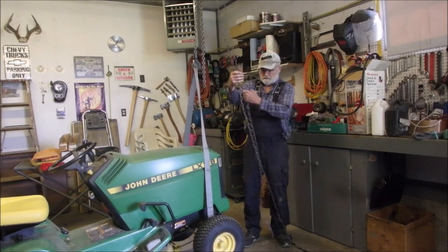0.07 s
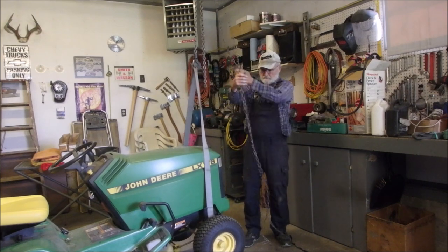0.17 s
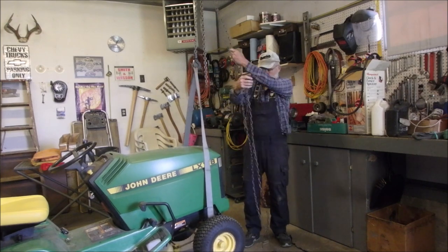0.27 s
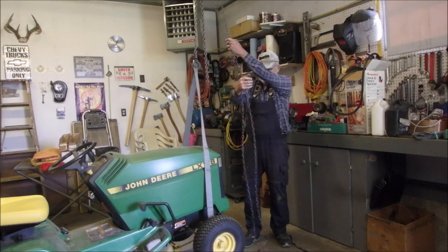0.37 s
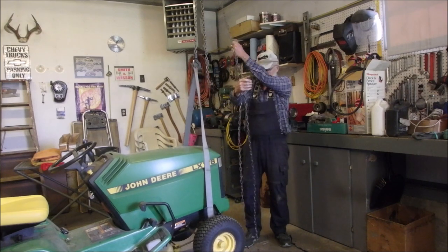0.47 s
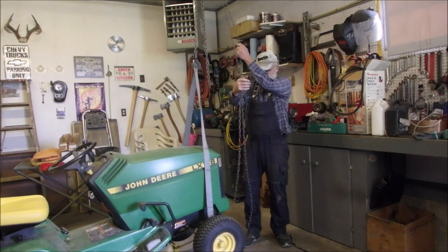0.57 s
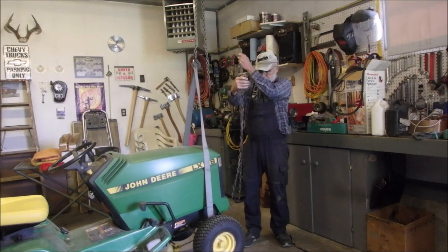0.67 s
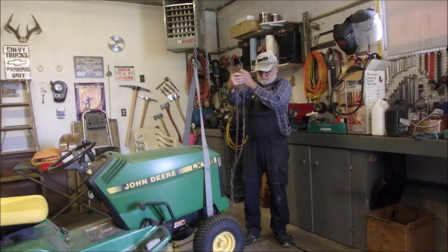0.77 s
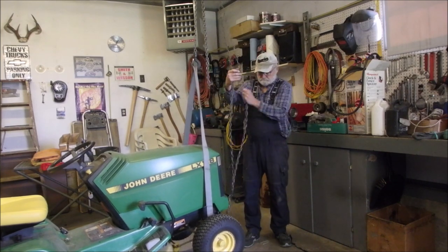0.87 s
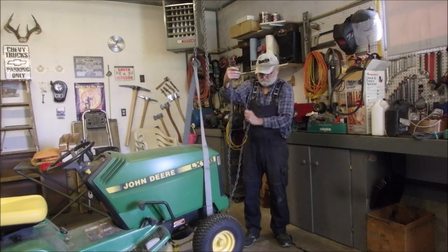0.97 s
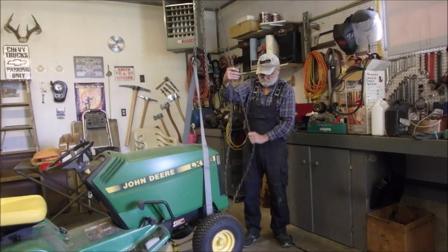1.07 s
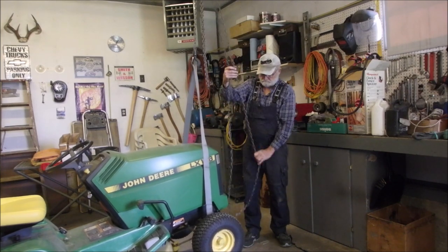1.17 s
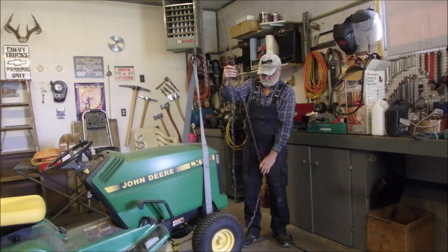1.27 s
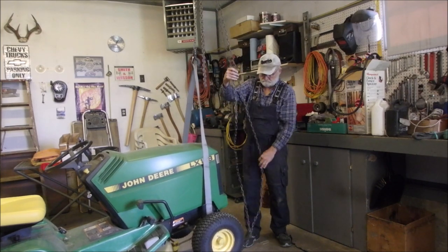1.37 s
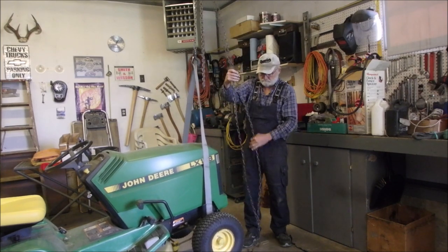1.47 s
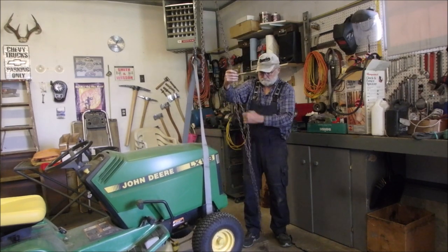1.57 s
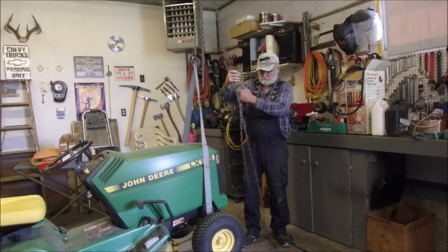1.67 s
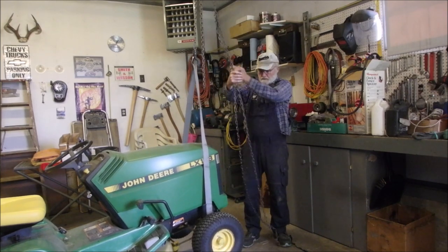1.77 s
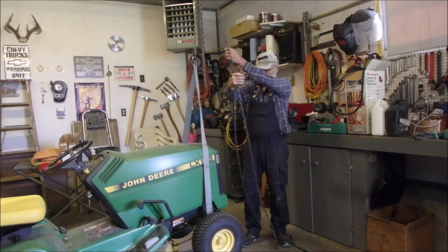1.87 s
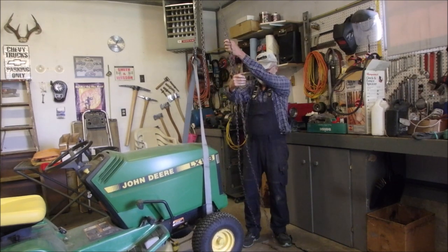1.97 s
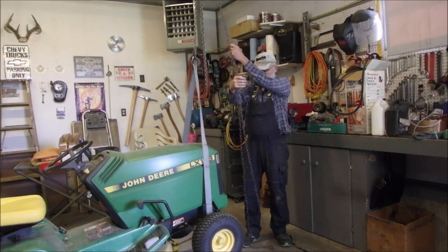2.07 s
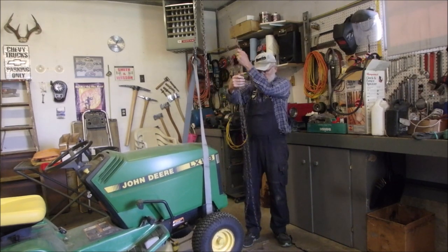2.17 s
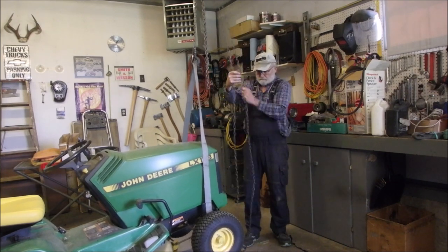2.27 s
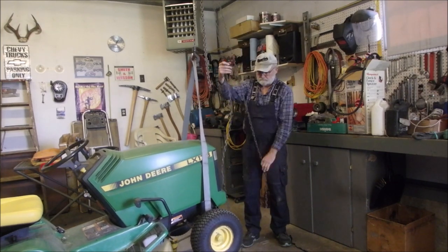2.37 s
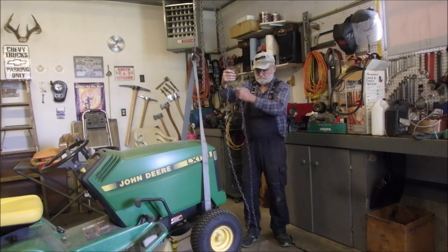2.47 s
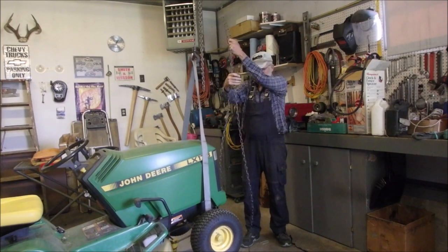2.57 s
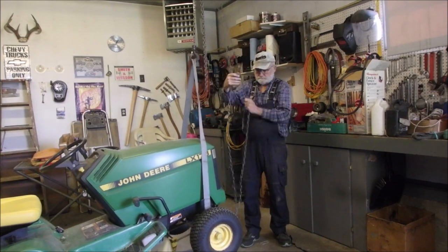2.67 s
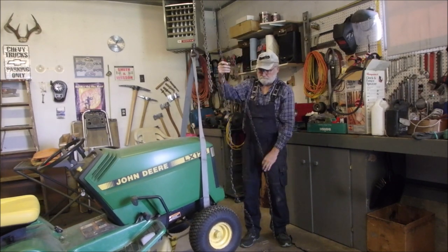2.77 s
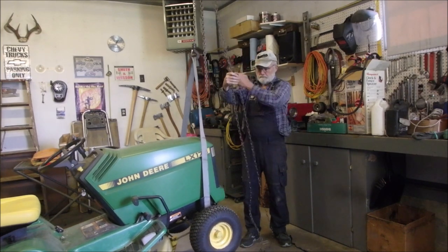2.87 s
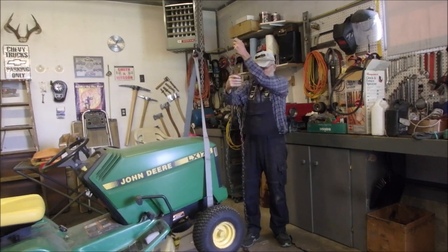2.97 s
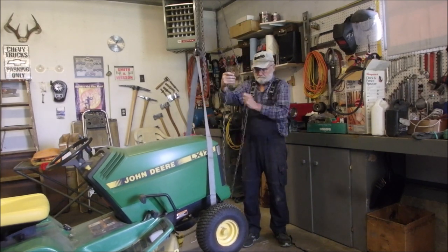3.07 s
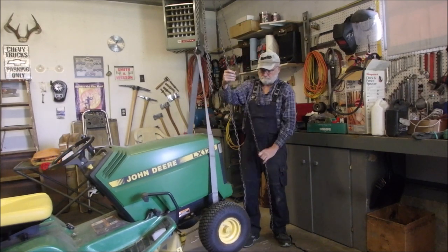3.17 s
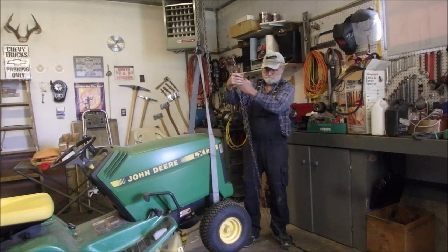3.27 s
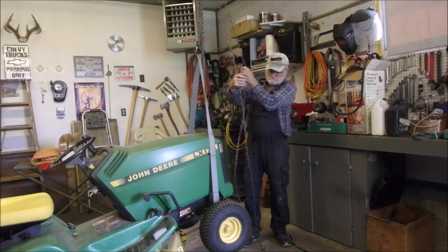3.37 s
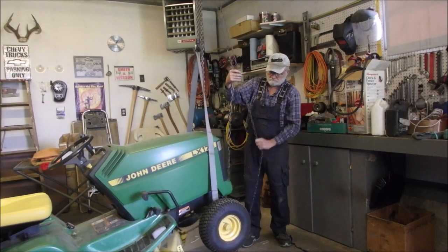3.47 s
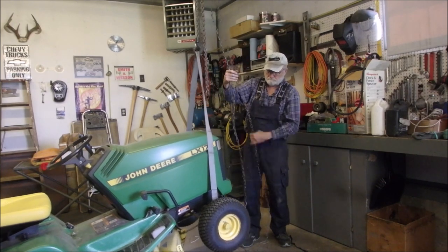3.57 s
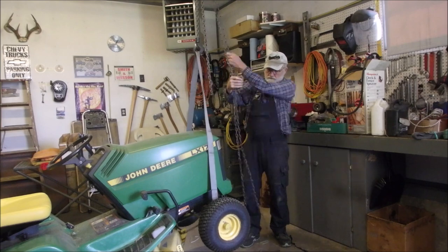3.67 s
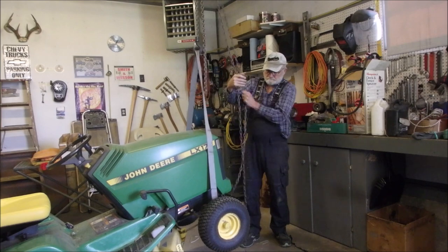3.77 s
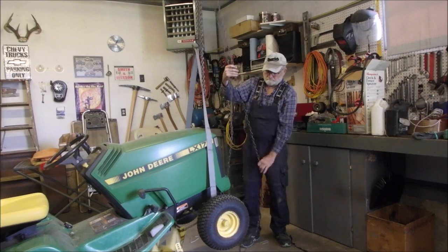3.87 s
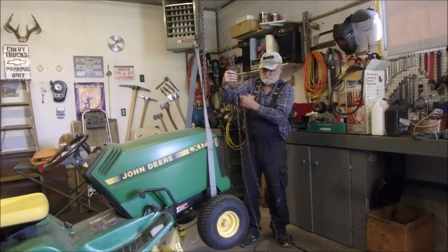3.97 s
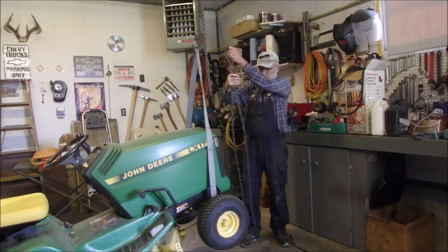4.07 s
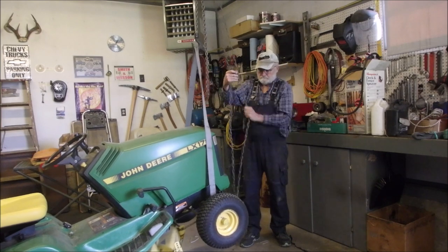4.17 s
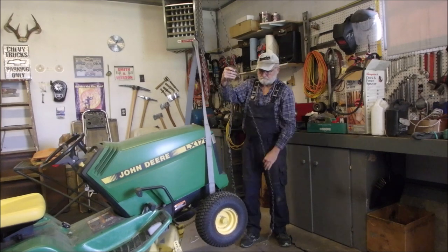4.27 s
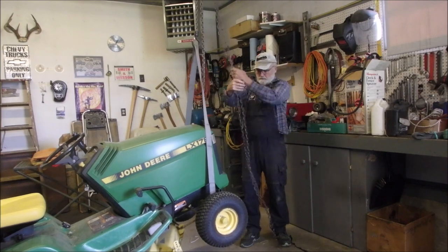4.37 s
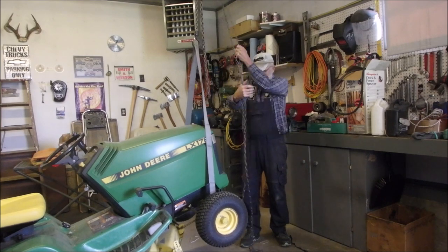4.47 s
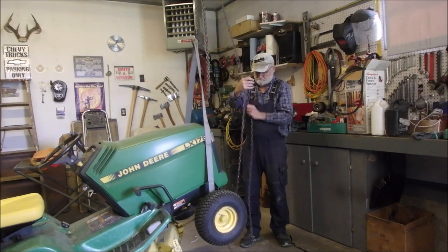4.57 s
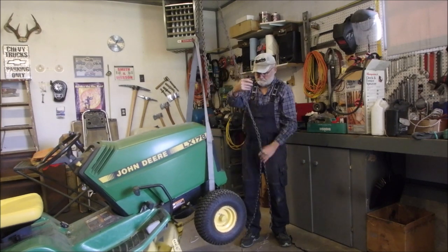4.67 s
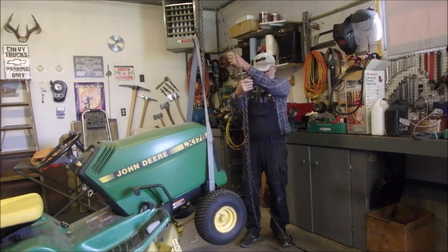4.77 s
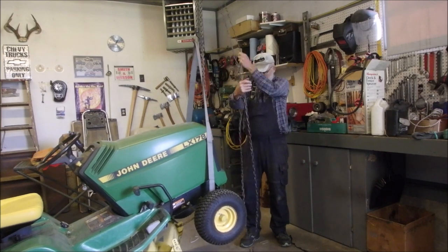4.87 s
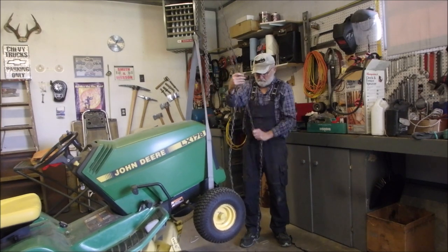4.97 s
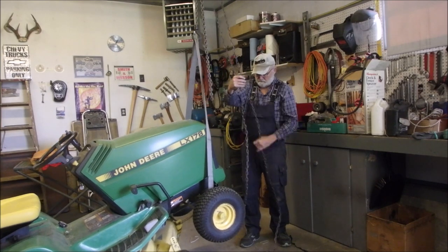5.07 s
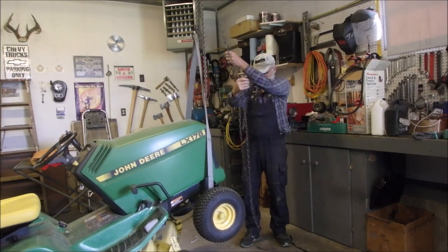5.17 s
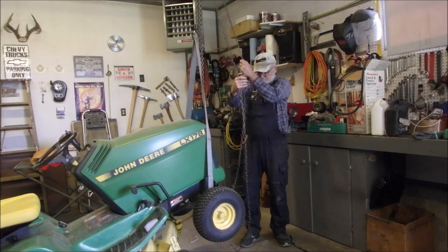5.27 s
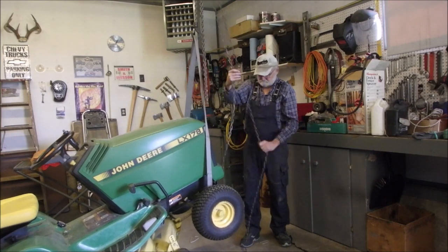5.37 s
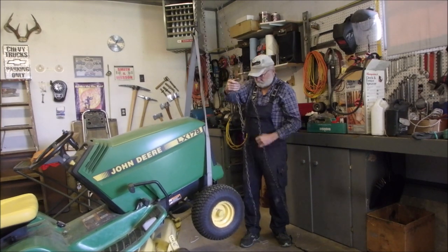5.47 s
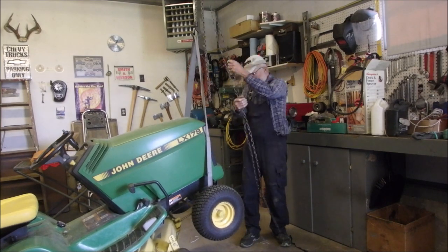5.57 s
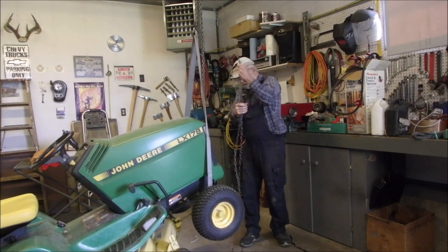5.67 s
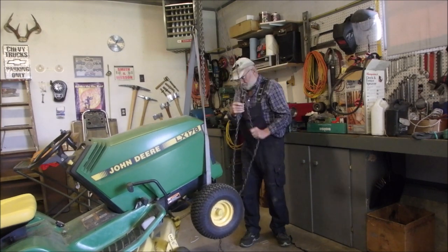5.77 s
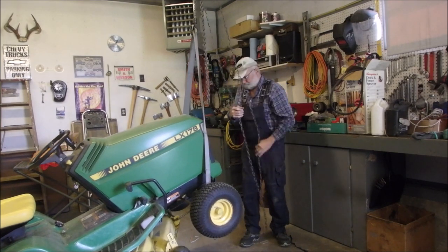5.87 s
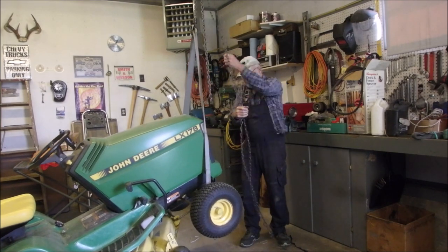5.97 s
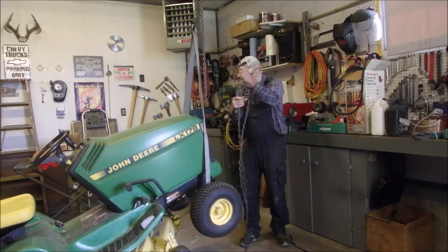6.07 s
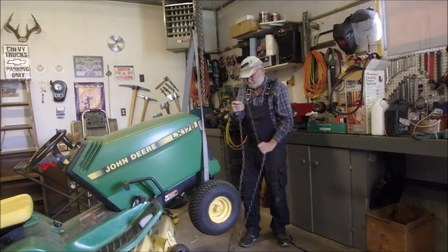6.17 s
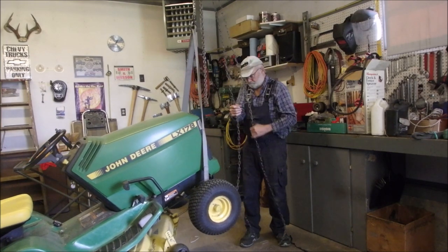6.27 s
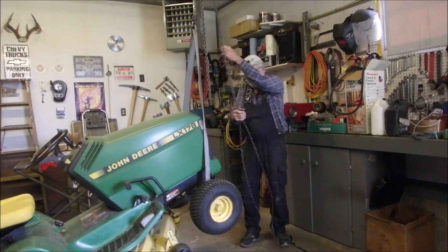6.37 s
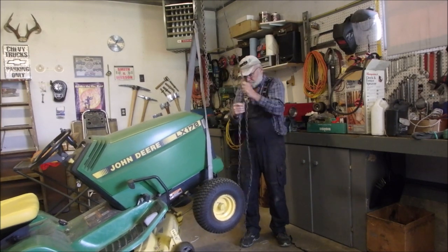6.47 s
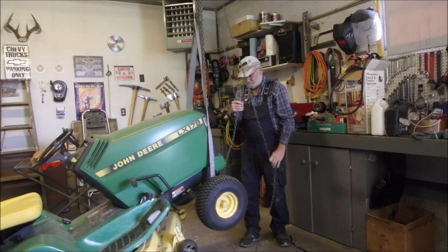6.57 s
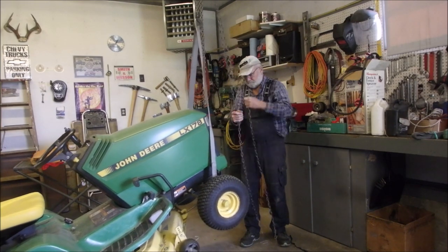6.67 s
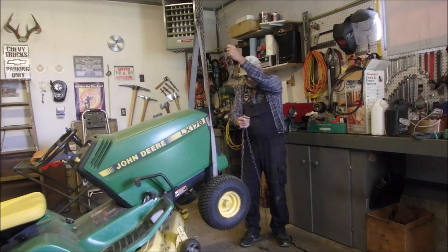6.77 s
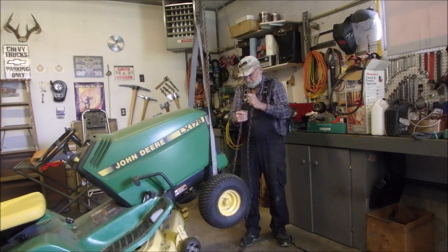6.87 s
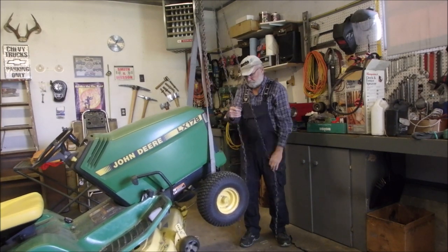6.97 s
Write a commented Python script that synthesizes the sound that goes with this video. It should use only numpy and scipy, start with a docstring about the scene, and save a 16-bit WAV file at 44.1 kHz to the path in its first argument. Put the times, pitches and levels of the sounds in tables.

```python
"""The end of a pull comes first, a brief clatter of links over faint workshop noise; a long haul follows.
A hand chain hoist is at work: the chain snaps, links clatter over the wheel, the pawl ticks and a faint
rumble swells; between pulls slack links jingle and the wheel knocks. After a cut it plays four times as fast.
Principle: contacts are impulses, or modulated trains of them, that excite the resonant steel and the
room; the rumble and the workshop are filtered noise."""
import sys
import numpy as np
from scipy import signal
from scipy.fft import rfft, irfft, next_fast_len
from scipy.io import wavfile

SR = 44100
rng = np.random.default_rng(int(sys.argv[2]) if len(sys.argv) > 2 else 0)


def output_pcm(signal):
    """Save a mono or channel-first signal as 16-bit PCM at the path in sys.argv[1].

    Samples are clipped to [-1, 1] before scaling.
    """
    pcm = np.clip(np.atleast_2d(signal).T, -1, 1) * 32767
    wavfile.write(sys.argv[1], SR, np.round(pcm).astype(np.int16))


N = 309613
TIME = np.arange(N) / SR
CUT_S, FAST = 2.321, 4  # time of the cut; playing speed after it
TOP_HZ = 15800  # upper band limit

# Pulls on the chain, slow then fast; start_s is when the pull is first heard, apart from its take-up.
# The first is already under way, and the one at 2.25 runs on across the cut as the next row.
# Levels are relative: start_s, rise_s, length_s, sag_db (fall over the pull), snap_db, links_db, wheel_db, rumble_db
PULLS = [ (0.0, 0.0016, 0.026, 12, -30, -32.5, -31, -35), (0.67, 0.21, 0.63, -2.5, -17.5, -22.5, -30, -41),
         (2.25, .025, 0.028, -1.5, -18, -23, -28.5, -16), (2.322, 0.0025, 0.13, 1, -21, -27, -31, -34),
         (2.676, 0.0084, 0.18, 5, -13.5, -29.5, -33, -25), (3.079, 0.081, 0.16, 6, -34, -23.5, -28, -23),
         (3.446, 0.02, 0.15, -3, -21, -27.5, -32, -25), (3.81, 0.011, 0.15, 3, -21, -26.5, -31, -24),
         (4.185, 0.01, .13, -2.5, -15, -24, -29.5, -22), (4.556, 0.023, 0.17, -1.5, -15.5, -27, -32, -27),
         (4.939, 0.022, 0.18, 0, -12, -27.5, -33, -28), (5.33, .03, 0.15, -0.5, -16, -26, -31, -26),
         (5.763, 0.015, 0.14, -2.5, -19, -25, -32.5, -28), (6.137, .015, 0.14, 0.5, -13, -25, -31, -22),
         (6.51, 0.0064, 0.16, 2, -15.5, -25, -31, -23), (6.891, 0.0086, 0.27, -8, -12, -23.5, -30.5, -27), ]
# Swings of the slack chain while the hand reaches up: start_s, length_s, level_db (relative)
REACHES = [(0.347, 0.088, -49), (0.445, .18, -47), (1.644, .3, -46.5), (2.006, 0.19, -52),
           (2.977, .045, -59), (4.125, .025, -49), (4.437, 0.038, -51)]
# Dull knocks of the wheel against its pawl, mostly as it settles: start_s, level_db (relative)
KNOCKS = [(0.471, -30.5), (0.753, -24), (1.957, -41), (2.025, -34), (2.19, -34.5), (2.27, -20),
          (2.531, -35), (3.297, -28), (3.389, -39), (3.642, -23.5), (4.297, -17), (4.774, -28),
          (5.537, -24), (5.684, -35.5), (5.949, -26), (6.082, -37), (6.339, -27.5), (6.716, -23.5)]
# Catches of the chain by the hand ahead of a pull: start_s, level_db (relative)
GRABS = [(0.644, -22.5), (2.622, -26), (3.011, -21.5), (3.418, -25), (3.783, -16.5), (4.15, -24),
         (4.507, -23), (4.884, -32), (5.283, -25.5), (5.739, -16), (6.103, -20.5), (6.464, -23.5),
         (6.862, -21)]
# Jolts of a link into its pocket in the wheel: start_s, level_db (relative)
JOLTS = [(0.715, -16.5), (0.755, -13), (2.268, -15.5), (2.709, -11), (3.461, -15), (4.206, -26),
         (6.156, -22)]
# Ring of the wheel after a knock, at natural speed: pitch_hz, level_db (energy against the knock), t60_s
WHEEL_RING = [(905, -22, 0.35), (2344, -30, 0.28)]

# Broad spectral colour of the hoist: frequency_hz, level_db
STEEL = [(8, -39), (30, -45.5), (70, -22), (140, -13), (300, -10.5), (550, -8.5), (900, 1.5), (1900, -3),
         (3000, 0), (5400, -6), (7500, 0), (10000, -7), (12500, -11.5), (15000, -23.5)]
# Resonances and, where negative, dips: centre_hz, width_hz, level_db
MODES = [(163, 25, 5), (217, 14, 8), (303, 25, 8), (541, 45, 6), (692, 14, 5), (811, 25, 6), (875, 80, 11),
         (1005, 45, 6), (1523, 45, 7), (1664, 150, 7), (2204, 45, -26), (2361, 12, 4), (2366, 80, 14),
         (2539, 80, 11), (2636, 45, 4), (2819, 150, 8), (3100, 45, -17), (3208, 45, 10), (3349, 25, 11),
         (3424, 45, 12), (3662, 80, 4), (3986, 80, 7), (4094, 45, -14), (4245, 80, 12), (4418, 300, 6),
         (4785, 300, 6), (5951, 80, 6), (6103, 80, -14), (6502, 300, 13), (8090, 300, 4), (8996, 30, 6)]
# Colours relative to the hoist: frequency_hz, level_db
KNOCK_TILT = [(100, 6.5), (500, 0), (900, -1), (1500, -0.5), (2400, -4.5), (5000, -17), (15000, -17)]
SNAP_TILT = [(100, -3.5), (500, -4), (900, 0.5), (1400, -1), (3000, -5), (7000, 4.5), (15000, 9.5)]
SLACK_TILT = [(100, -10), (900, -14), (2500, -13), (5000, -1.5), (6500, -4.5), (8000, 3), (15000, 7.5)]
# The heavy wheel sounds below the light links: frequency_hz, level_db
WHEEL_TILT = [(30, 7), (100, -3), (500, 3), (900, 1.5), (1150, 3), (1500, -0.5), (2200, 0), (5000, -87)]
LINK_TILT = [(400, -37), (900, -21), (1200, -12), (1550, 2), (4000, 1.5), (15000, 5)]
# Background noise of the workshop: frequency_hz, level_db
AIR = [(10, -44), (45, -26), (90, -16.5), (170, -4.5), (400, -4.5), (900, -3), (3000, -9), (15000, -31)]
# Deep rumble under the pulls: frequency_hz, level_db
RUMBLE = [(10, 4.5), (30, -11), (100, -7.5), (180, -7.5), (500, -50)]
# Width of the stereo image: frequency_hz, side_minus_mid_db
WIDTH = [(20, -19), (100, -41), (350, -117), (700, -28), (1300, -36.5), (2400, -18), (4400, -8),
         (8100, -6.5), (15000, 2)]
# Reverberation of the workshop at natural speed: frequency_hz, t60_s
ROOM = [(100, 1.6), (500, 0.9), (1500, 0.86), (4000, 0.85), (8000, 0.61), (15000, 0.21)]

# Envelope of every pull
TAKE_UP_S = 0.041  # the slack runs out this long before start_s
TAKE_UP_DB, TAKE_UP_GROWS_DB = -9, 15.5  # level that this running reaches, and its growth on the way
START_DB = -8.5  # level at start_s, against the full haul
COAST_DB_PER_S = 98.5  # decay at natural speed as the wheel slows once the arm stops


def amp(db):
    """Level: decibels become an amplitude ratio."""
    return 10 ** (np.asarray(db) / 20)


def along(points, hz):
    """Interpolation: a table is read along a logarithmic frequency axis."""
    table_hz, values = np.transpose(points)
    return np.interp(np.log(hz + 1), np.log(table_hz), values)


def at_speed(rows, speed):
    """Time scale: select the events in the part played at this speed."""
    return [row for row in rows if (row[0] < CUT_S) == (speed == 1)]


def workshop(speed, air_db=-58.5):
    """Stationary noise: filtered noise, nearly alike in both ears, fills one side of the cut."""
    size = next_fast_len(N, True)
    hz = np.fft.rfftfreq(size, 1 / SR) / speed
    spectra = rfft(rng.standard_normal((2, size))) * amp(along(AIR, hz))
    mid = irfft(spectra[0], size)[:N]
    side = irfft(spectra[1] * amp(along(WIDTH, hz)), size)[:N]
    heard = (TIME < CUT_S) == (speed == 1)
    return amp(air_db) * heard * np.array([mid + side, mid - side]) / mid.std()


def effort(start_s, rise_s, length_s, sag_db, speed):
    """Amplitude envelope: the slack runs out, the haul builds, sags or swells, and the wheel coasts to rest."""
    age = TIME - start_s
    early = np.clip(-age / TAKE_UP_S, 0, 1)
    take_up = (early < 1) * amp(TAKE_UP_DB - TAKE_UP_GROWS_DB * early)
    build_db = START_DB * np.clip(1 - age / rise_s, 0, 1)
    hold_db = sag_db * (.5 - np.clip(age / length_s, 0, 1))
    coast_db = -COAST_DB_PER_S * speed * np.clip(age - length_s, 0, 1)
    return np.where(age < 0, take_up, amp(build_db + hold_db + coast_db))


def rumble(gain_db=-47, side_db=-1, share=0.47, fade_db=1):
    """Modulated noise: a deep rumble, wider than the clatter, swells in the first part of each row of PULLS."""
    size = next_fast_len(N, True)
    colour = amp(along(RUMBLE, np.fft.rfftfreq(size, 1 / SR)))
    mid, side = irfft(rfft(rng.standard_normal((2, size))) * colour, size)[:, :N]
    side = amp(side_db) * side
    pair = np.array([mid + side, mid - side]) / mid.std()
    swell = np.zeros(N)
    for speed in (1, FAST):
        for start_s, rise_s, length_s, *_, rumble_db in at_speed(PULLS, speed):
            pull = effort(start_s, rise_s, share * length_s, fade_db, speed)
            swell += amp(rumble_db) * (TIME > start_s) * pull
    return amp(gain_db) * swell * pair


def housing_db(hz):
    """Modal superposition: resonant peaks and dips add in decibels to the broad colour of the steel."""
    modes_db = sum(db / (1 + (2 * (hz - centre) / width) ** 2) for centre, width, db in MODES)
    return along(STEEL, hz) + modes_db


def causal(gain):
    """Minimum phase: folding the cepstrum gives the causal response with this gain."""
    cepstrum = irfft(np.log(np.maximum(gain, 1e-6)))
    half = len(cepstrum) // 2
    cepstrum[1:half] *= 2
    cepstrum[half + 1:] = 0
    return np.exp(rfft(cepstrum))


def ringer(speed):
    """Linear response of hoist and room; faster playing raises pitch and shortens time alike."""
    size = 2 ** 15 // speed
    t = np.arange(size) / SR * speed  # natural time
    hz = np.fft.rfftfreq(size, 1 / SR) / speed  # natural frequency
    body_db, width = housing_db(hz), amp(along(WIDTH, hz))
    cut = round(CUT_S * SR)
    start, end = (0, cut) if speed == 1 else (cut, N)

    def sound(contacts, tilt=None, crack_db=10, crack_t60=0.011, early_db=5, early_t60=0.21, rise_s=0.00088):
        """Convolution: contacts at one spot ring the steel along their own path through the room."""
        # reverberant tail: noise that decays at its own rate in each band
        bins, frames, cells = signal.stft(rng.standard_normal((2, size)), SR, nperseg=256)
        decay = amp(-60 * speed * frames / along(ROOM, bins / speed)[:, None])
        tail = signal.istft(cells * decay, SR, nperseg=256)[1][:, :size]
        # the direct crack and the nearest walls stand above the long tail
        early = amp(crack_db - 60 * t / crack_t60) + amp(early_db - 60 * t / early_t60)
        answer = tail + early * rng.standard_normal((2, size))
        answer *= 1 - np.exp(-t / rise_s)
        colour = causal(amp(body_db + (along(tilt, hz) if tilt else 0)))
        mid, side = irfft(rfft(answer) * [colour, colour * width])
        pair = np.float32([mid + side, mid - side] / np.linalg.norm(mid))
        # only this side of the cut is heard
        part = np.float32(contacts[None, start:end])
        out = np.zeros((2, N), np.float32)
        out[:, start:end] = signal.oaconvolve(part, pair, axes=1)[:, :end - start]
        return out
    return sound


def impulses(times, sizes):
    """Impulsive excitation: each contact is a single sample."""
    return np.bincount(np.round(np.asarray(times) * SR).astype(int), sizes, N)[:N]


def rattle(per_s, scatter_db):
    """Random impulse train: link contacts of scattered strength, with unit power."""
    chance = rng.random(N) * SR / per_s
    at = np.flatnonzero(chance < 1)
    hits = np.zeros(N)
    # most contacts are light, a few are heavy; they push either way
    hits[at] = (-1) ** at * amp(-scatter_db * np.log(chance[at]))
    return hits / hits.std()


def slack(sound, speed, jingle_db=1.5, sway_db=-59, settle_db_per_s=40):
    """Decaying excitation: loose links jingle at each reach, and the hanging loop never quite rests."""
    swing = np.zeros(N)
    for start_s, length_s, level_db in REACHES:
        during = (TIME >= start_s) & (TIME < start_s + length_s)
        swing += during * amp(level_db + jingle_db - settle_db_per_s * abs(TIME - start_s))
    jingle = sound(swing * rattle(per_s=220 * speed, scatter_db=3.0), SLACK_TILT)
    stray = rattle(per_s=120 * speed, scatter_db=3)
    return jingle + sound(amp(sway_db) * stray)


def blows(rows, speed, gain_db, bounce_s=.007, bounce_db=-7, count=3):
    """Inelastic rebound: each row is one heavy contact and two quick, weaker bounces."""
    start_s, level_db = np.transpose(rows)[:, :, None]
    gaps = rng.uniform(.5, 2, (len(rows), count)) * bounce_s / speed
    times = start_s + np.cumsum(gaps, axis=1) - gaps[:, :1]  # the first contact falls on start_s
    sizes = amp(level_db + gain_db + bounce_db * np.arange(count)) / np.sqrt(speed)
    return impulses(times.ravel(), sizes.ravel())


def ring_on(contacts, speed):
    """Free vibration: contacts together with the decaying tones that they leave in the wheel."""
    t = np.arange(SR // speed) / SR * speed
    ring = np.zeros(len(t))
    for pitch_hz, level_db, t60_s in WHEEL_RING:
        tone = np.sin(2 * np.pi * pitch_hz * t) * amp(-60 * t / t60_s)
        ring += amp(level_db) * tone / np.linalg.norm(tone)
    return contacts + signal.oaconvolve(contacts, ring * np.sqrt(speed))[:N]


def wheel_knocks(sound, speed):
    """Impact and resonance: the wheel knocks dully against its pawl and rings on."""
    contacts = blows(at_speed(KNOCKS, speed), speed, gain_db=21.5)
    return sound(ring_on(contacts, speed), KNOCK_TILT)


def chain_snaps(sound, speed):
    """Impact excitation: the hand's grab, a snap at the start of each row of PULLS, and jolts in the wheel."""
    snaps = [(start_s, snap_db) for start_s, _, _, _, snap_db, *_ in PULLS]
    rows = at_speed(GRABS + snaps + JOLTS, speed)
    return sound(blows(rows, speed, gain_db=23.0), SNAP_TILT)


def pawl(speed, teeth_per_s=22, unevenness=.13, count=1200):
    """Quasi-periodic impulses: the pawl drops off one ratchet tooth after another, with unit power."""
    gaps, sizes = rng.standard_normal((count, 2)).T
    times = np.cumsum(np.exp(unevenness * gaps)) / (teeth_per_s * speed)
    heard = times < N / SR
    ticks = impulses(times[heard], amp(1.5 * sizes[heard]))
    return ticks / ticks.std()


def hauling(sound, speed, strand_db=-4.5, pawl_db=-4, turns_per_s=.37, wheel_sag_db=4):
    """Coupled excitation: each contact of link or pawl rings both the light links and the heavy wheel."""
    links, wheel = np.zeros((2, N))
    for start_s, rise_s, length_s, sag_db, _, links_db, wheel_db, _ in at_speed(PULLS, speed):
        links += amp(links_db) * effort(start_s, rise_s, length_s, sag_db, speed)
        wheel += amp(wheel_db) * effort(start_s, rise_s, length_s, sag_db + wheel_sag_db, speed)
    # the load shifts between the two strands as the wheel turns
    angle = 2 * np.pi * turns_per_s * speed * TIME
    trains = [amp(pawl_db) * pawl(speed)]
    for share in (np.cos(angle), np.sin(angle)):
        strand = rattle(per_s=280 * speed, scatter_db=1.52)
        trains.append(amp(strand_db) * np.sqrt(2) * share * strand)
    return sum(sound(links * hits, LINK_TILT) + sound(wheel * hits, WHEEL_TILT) for hits in trains)


def hoist(speed):
    """Superposition: the workshop noise and the sounds of the work add at one playing speed."""
    sound = ringer(speed)
    between_pulls = slack(sound, speed) + wheel_knocks(sound, speed)
    pulls = chain_snaps(sound, speed) + hauling(sound, speed)
    return workshop(speed) + between_pulls + pulls


def scene():
    """Level difference between ears: natural speed, then fast motion, all a little to the right."""
    return (rumble() + hoist(1) + hoist(FAST)) * amp([[-.4], [.4]])


def record(dry):
    """Band limitation: nothing is kept above the upper limit."""
    size = next_fast_len(N + SR // 2)
    kept = np.fft.rfftfreq(size, 1 / SR) < TOP_HZ
    return irfft(rfft(dry, size) * kept, size)[:, :N]


dry = scene()
out = record(dry)
output_pcm(out)
```